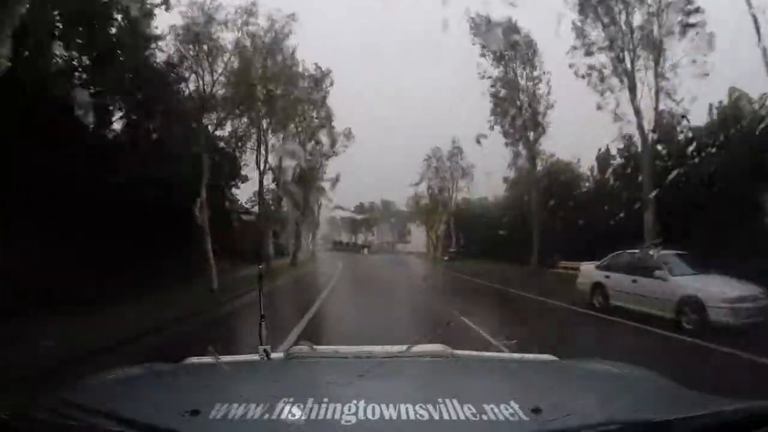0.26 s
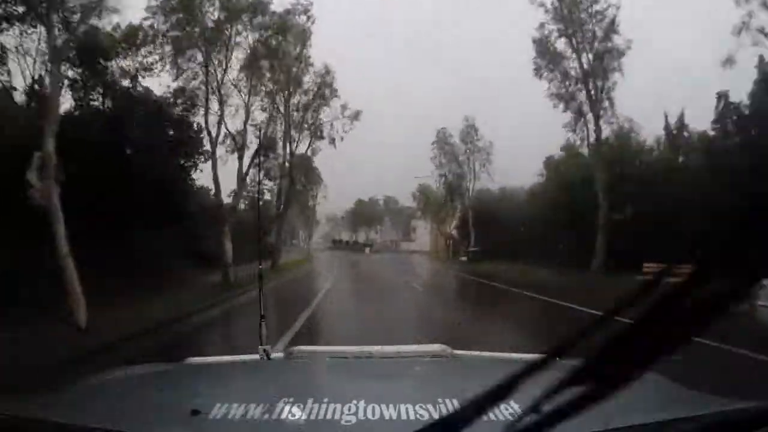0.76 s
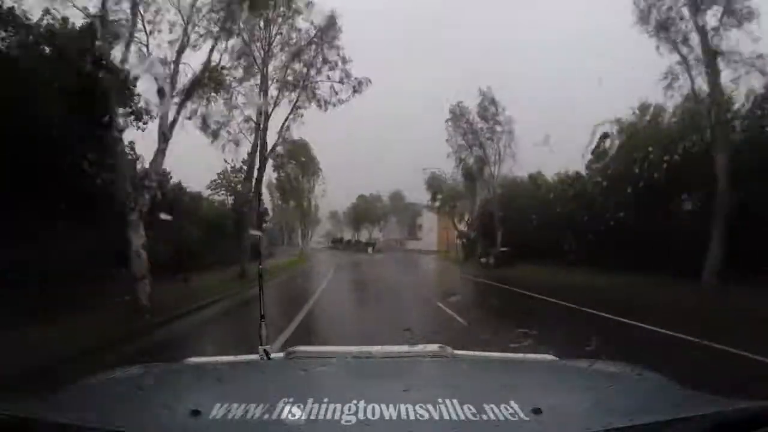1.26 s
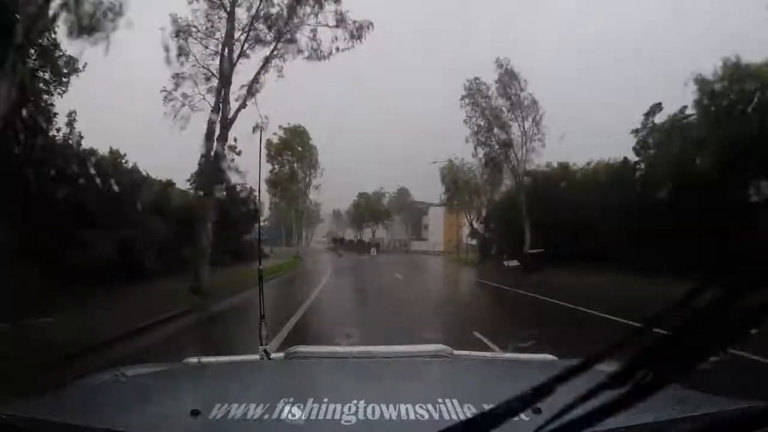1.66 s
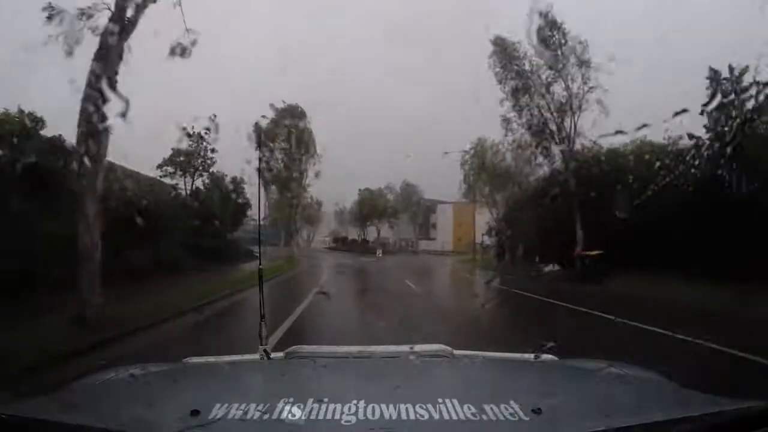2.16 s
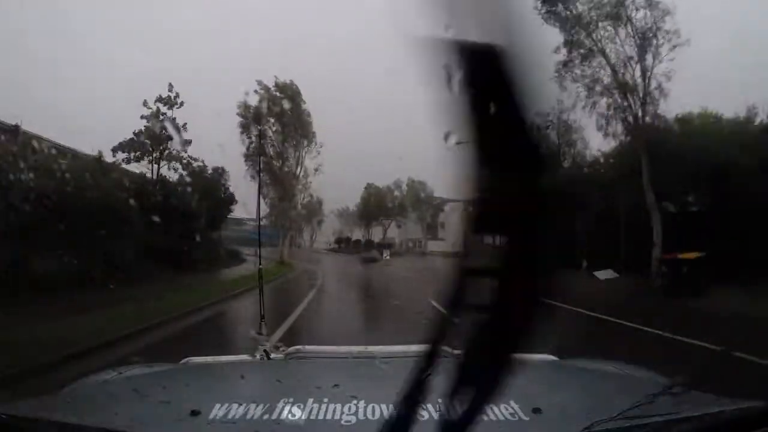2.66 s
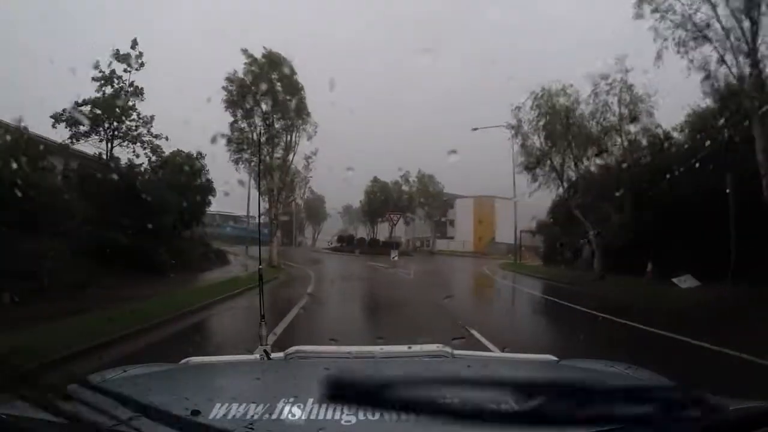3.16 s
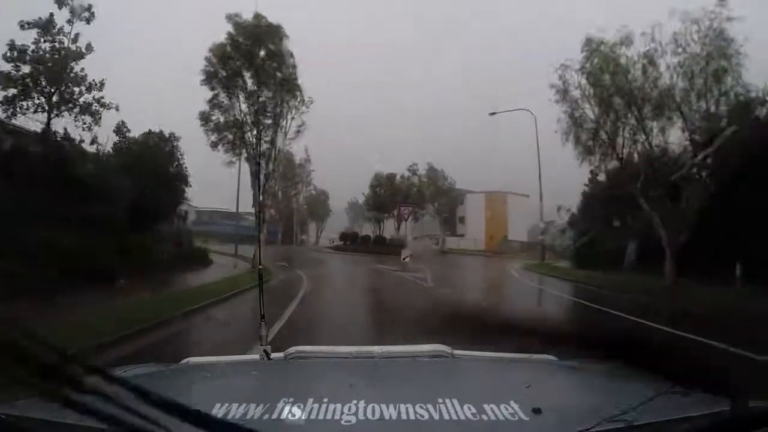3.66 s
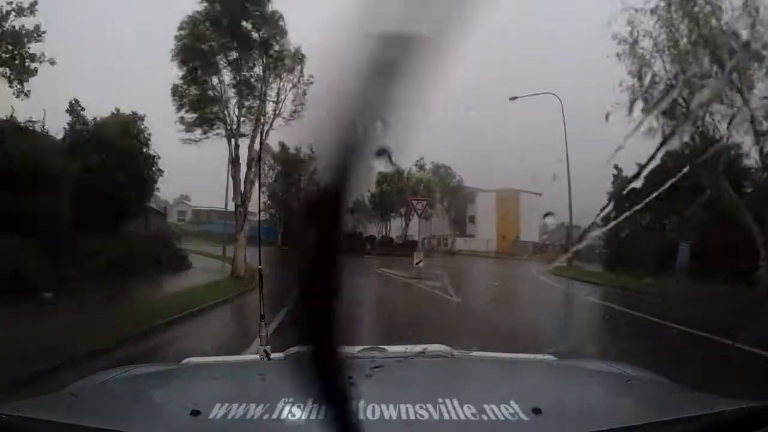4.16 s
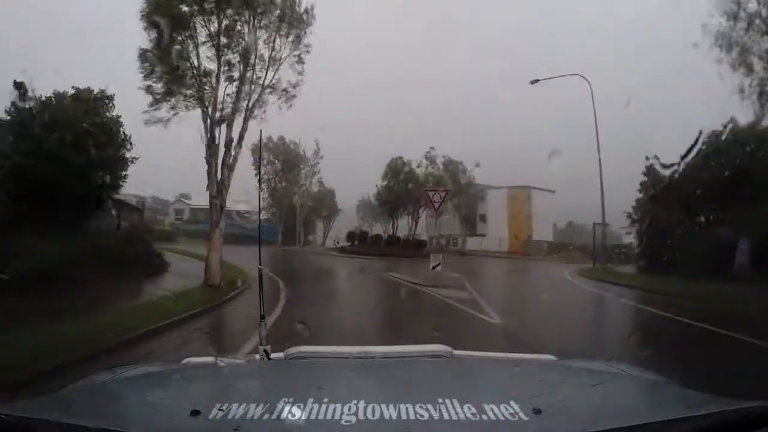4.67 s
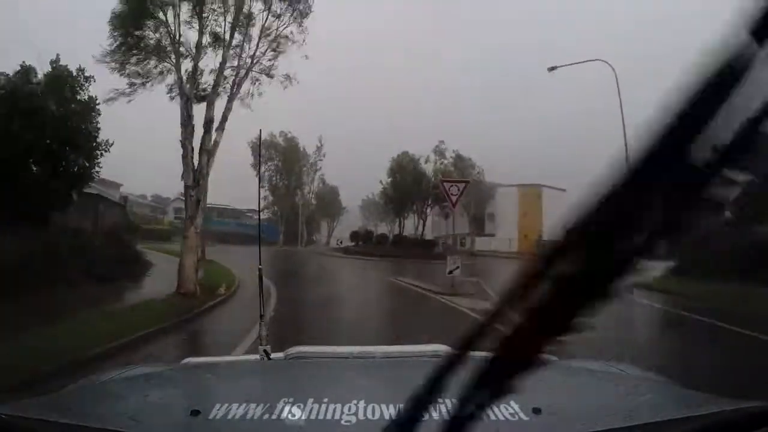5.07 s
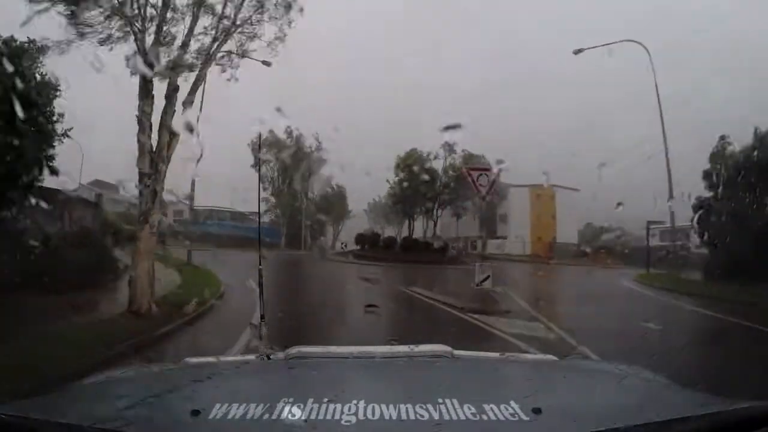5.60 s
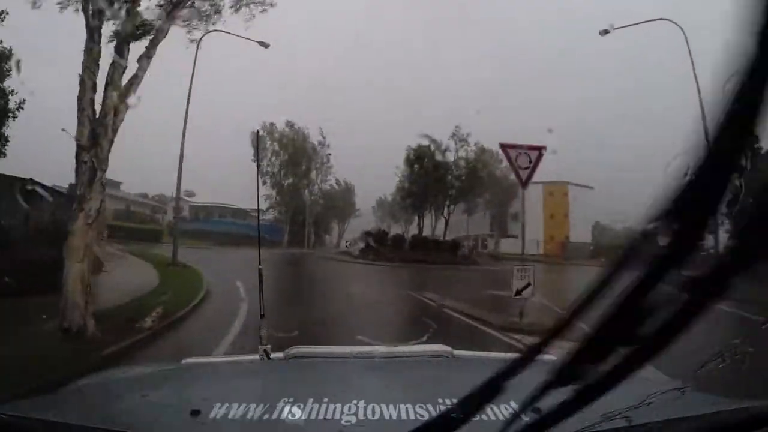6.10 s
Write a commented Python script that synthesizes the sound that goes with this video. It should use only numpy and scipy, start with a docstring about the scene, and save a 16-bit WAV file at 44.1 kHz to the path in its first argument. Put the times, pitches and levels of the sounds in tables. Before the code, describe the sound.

Inside a car in heavy rain, drops spatter and crack on glass and roof while fast wipers thud over low road rumble.

```python
"""Sheets of rain spatter on a car's windscreen, heard from inside, and drum on the roof: random drop impacts.
Heavy drops crack on the glass, fat ones knock on the roof and gusts fling flurries at the body.
Fast wipers thud at the foot of each sweep, ringing cowl modes, and their rubber judders as noisy slips.
Underneath, road and wind rumble as cabin-coloured noise and a slowing engine drones as a wavering sine."""
import sys
import numpy as np
from scipy import signal
from scipy.fft import rfft, irfft, next_fast_len
from scipy.io import wavfile
from scipy.ndimage import uniform_filter1d, minimum_filter1d

SR = 44100
rng = np.random.default_rng(int(sys.argv[2]) if len(sys.argv) > 2 else 0)


def store_wav(level_fs):
    """Save 16-bit WAV to argv[1]."""
    pcm = np.round(np.clip(np.atleast_2d(level_fs), -1, 1) * 32767)
    wavfile.write(sys.argv[1], SR, pcm.T.astype(np.int16))


N = 279594

# strength of the rain on the windscreen: t/s, relative level/dB
RAIN = [(0.0, -38.5), (0.12, -38), (0.36, -41), (0.55, -42), (0.74, -41), (0.868, -39.5), (0.892, -45),
        (1.08, -45.5), (1.21, -42), (1.29, -39.5), (1.36, -39), (1.5, -37.5), (1.66, -42), (1.8, -45.5),
        (1.92, -41), (2.05, -42.5), (2.21, -39), (2.42, -39), (2.8, -44.5), (3.0, -52.5), (3.28, -52.5),
        (3.54, -41), (3.62, -46), (3.82, -49), (3.95, -49.5), (3.98, -46), (4.08, -45.5), (4.32, -44.5),
        (4.355, -55), (4.39, -49), (4.43, -53), (4.46, -47), (4.6, -47), (4.73, -40.5), (4.98, -40.5),
        (5.04, -44), (5.23, -43), (5.3, -48.5), (5.53, -43.5), (5.63, -39.5), (5.71, -45), (5.97, -44.5),
        (5.995, -53.5), (6.035, -48.5), (6.15, -38), (6.26, -41.5), (6.34, -39.5)]
# wiper strokes: thud t/s, thud relative level/dB, blade flop t/s, flop relative level/dB,
# judder level ahead of its low-pass/dB, judder low-pass f/Hz, pitch of the turn f/Hz,
# reference level of the rub over the top/dB
WIPER_STROKES = [(.100, -14.5, 0.06, -13, -19, 890, 206, -26),
                 (0.968, -14, 0.97, -12.5, -21.5, 900, 607, -27.5),
                 (1.830, -12.5, 1.799, -14.5, -20.5, 900, 308, -29),
                 (2.709, -14.5, 2.84, -15, -21.5, 950, 294, -27),
                 (3.572, -11.5, 4, -18.5, -26, 760, 430, -29.5),
                 (4.436, -12, 4.404, -12, -27, 700, 430, -29.5),
                 (5.309, -13, 4.4, -10, -22.5, 600, 352, -31.5),
                 (6.163, -19, 5.7, -22, -23, 1200, 327, -30)]


def from_db(db):
    """Decibels to gain."""
    return 10 ** (np.asarray(db) / 20)


def rms_one(x):
    """Scale to rms 1."""
    return x / np.sqrt(np.mean(x ** 2) + 1e-20)


def in_time(rows):
    """Interpolate each column of a timed curve to every sample."""
    s, *columns = np.transpose(rows)
    return [np.interp(np.arange(N) / SR, s, column) for column in columns]


def add(out, s, sound):
    """Mix a sound in at a time in seconds."""
    at = round(s * SR)
    if 0 <= at < N:
        out[at:at + len(sound)] += sound[:N - at]


def low_pass(x, order, edge_hz):
    """Butterworth low-pass: takes the treble off above the edge."""
    return signal.sosfilt(signal.butter(order, edge_hz, fs=SR, output="sos"), x)


def bump(t, centre_s, width_s):
    """Bell-shaped swell with peak 1; the width is the time from the peak to 1/e."""
    return np.exp(-((t - centre_s) / width_s) ** 2)


def drift(corner_hz):
    """Slow random wander of rms 1: noise through two equal low-pass poles."""
    step, warm_up = 40, 2000  # in samples; in steps
    pole = np.exp(-2 * np.pi * corner_hz * step / SR)
    noise = rng.standard_normal(N // step + warm_up + 2)
    slow = signal.lfilter([1], [1, -2 * pole, pole * pole], noise)[warm_up:]
    return np.interp(np.arange(N) / step, np.arange(len(slow)), rms_one(slow))


def colour(x, spectrum):
    """Causal minimum-phase filter: a source's spectrum with the cabin's resonances on top."""
    # cabin and panel resonances: f/Hz, width/Hz, lift/dB
    cabin = [(41.9, 15.4, 8.5), (144.7, 8.7, 5.5), (255, 17.5, -5), (282.7, 20, 6.5), (407.4, 35, 6.5),
             (447, 85, 6), (627, 46, 8), (757.4, 22, 3.5), (1270, 49, 3.5)]
    size = 2 * next_fast_len(N // 2 + SR // 2)
    hz = np.maximum(np.arange(size // 2 + 1) * SR / size, 1)
    points = np.array(sorted(spectrum))
    db = np.interp(np.log(hz), np.log(points[:, 0]), points[:, 1])
    for centre, width, lift in cabin:
        db = db + lift / (1 + (2 * (hz - centre) / width) ** 2)
    # folding the cepstrum onto positive time gives the minimum phase
    cepstrum = irfft(np.log(from_db(db)))
    cepstrum[1:size // 2] *= 2
    cepstrum[size // 2 + 1:] = 0
    return irfft(rfft(x, size) * np.exp(rfft(cepstrum)))[:N]


def splash(t60, tail_db):
    """One impact: a crack, then waves scattering in the panel and cabin as decaying noise; energy 1."""
    t = np.arange(SR // 10) / SR
    tail = rng.standard_normal(len(t)) * from_db(-60 * t / t60)
    shape = from_db(tail_db) * tail / np.linalg.norm(tail)
    shape[0] += 1  # the crack
    return shape / np.linalg.norm(shape)


def patter(per_s, spread_db, t60, tail_db, count=12):
    """Drops of many sizes land at random on several spots of a panel; even level, rms 1."""
    sizes = from_db(spread_db * np.minimum(rng.exponential(1, N), 5)) * rng.choice([-1, 1], N)
    landed = rng.random(N) < per_s / SR
    drops = sizes * landed / np.sqrt(per_s)  # dense rain gets smoother, not louder
    spot = rng.integers(0, count, N)
    out = np.zeros(N)
    for k in range(count):
        out += signal.oaconvolve(drops * (spot == k), splash(t60, tail_db))[:N]
    return rms_one(out)


def rain_swing():
    """How far the rain is above its mean level, in dB."""
    level_db, = in_time(RAIN)
    return level_db - level_db.mean()


def engine():
    """A wavering sine drone at the firing rate, sinking as the car slows."""
    # engine: t/s, firing rate f/Hz, level/dB
    drone = [(0, 88, -38), (1.8, 86, -31.5), (2.7, 84.9, -28.5), (4.2, 80.98, -34), (4.8, 78, -30.5),
             (5.6, 74.2, -38), (6.34, 73.2, -29)]
    hz, level_db = in_time(drone)
    wavering_hz = hz * (1 + 0.0121 * drift(corner_hz=2.06))
    phase = 2 * np.pi * np.cumsum(wavering_hz) / SR
    return np.sqrt(2) * from_db(level_db + 2.0 * drift(corner_hz=5.3)) * np.sin(phase)


def road():
    """Tyres and wind shake the body as low noise; each bump makes the cabin boom for a moment."""
    # bumps in the road: t/s, boom level/dB; the first row, at 0.125 s, instead thickens the low body of the
    # first wiper thud
    booms = [(.125, -13), (.43, -25), (.64, -17.5), (1.08, -22), (1.40, -19), (1.88, -16.5), (2.24, -23),
             (2.63, -17.5), (2.74, -21.5), (2.9, -21), (3.16, -20), (3.35, -25), (4.028, -20), (4.47, -17),
             (4.97, -22.5), (5.57, -24.5), (5.82, -16.5), (6.07, -27)]
    # rumble: f/Hz, relative level per Hz/dB
    spectrum = [(8, -26), (24, -2.5), (33, -4), (58, -3.5), (75, -8.5), (100, -15.5), (120, -10.5),
                (165, -29), (300, -26), (1000, -62.5), (15000, -120)]
    level_db, fade_db_per_s = -21.5, 0.06
    rise_s, fall_s = 0.032, 0.091
    t = np.arange(N) / SR
    power = from_db(level_db - fade_db_per_s * t) ** 2
    for s, db in booms:
        power = power + (from_db(db) * bump(t, s, np.where(t < s, rise_s, fall_s))) ** 2
    shake = rms_one(colour(rng.standard_normal(N), spectrum))
    even_shake = shake / np.sqrt(uniform_filter1d(shake ** 2, SR // 6))
    return np.sqrt(power) * even_shake


def gusts():
    """Gusts fling short flurries of drops against the body panels."""
    # flurries: t/s, level/dB, time from peak to 1/e/s
    flurries = [(0.288, -34, 0.033), (1.496, -33.5, 0.16), (2.213, -32.5, 0.025), (2.424, -31, 0.073),
                (3.48, -33.5, 0.058), (3.656, -35.5, 0.06), (4.245, -33.5, 0.049), (4.545, -42, 0.022),
                (5.183, -35.5, 0.065), (5.638, -36.5, 0.1), (6.282, -32, 0.2)]
    # drops on the body: f/Hz, relative level per Hz/dB
    spectrum = [(100, -14.5), (300, -18.5), (420, -9.5), (600, -3), (820, -1), (1000, -13), (1500, -22),
                (3000, -36.5), (15000, -67)]
    t = np.arange(N) / SR
    swell = sum(from_db(db) * bump(t, s, width) for s, db, width in flurries)
    drops = patter(2000, spread_db=1.0, t60=0.022, tail_db=8.5, count=8)
    return swell * rms_one(colour(drops, spectrum))


def roof():
    """The lined roof passes only the dull drumming of the drops, which swells with the rain."""
    # drumming: f/Hz, relative level per Hz/dB
    spectrum = [(20, -7), (60, -17), (145, -5.5), (210, 1), (400, -5), (540, -7), (800, -9), (980, -17.5),
                (1500, -20), (3000, -46), (15000, -81.5)]
    mean_rain_db, follows = -31, 0.36  # level at mean rain; dB of drumming per dB of rain
    drops = patter(1900, spread_db=2.27, t60=0.045, tail_db=3.0)
    return from_db(mean_rain_db + follows * rain_swing()) * rms_one(colour(drops, spectrum))


def roof_knocks():
    """A fat drop knocks hollowly on the roof: its spot swings briefly and the panel scatters the wave."""
    # knocks: t/s, relative level/dB, pitch f/Hz
    knocks = [(0.045, -14, 324), (0.222, -19.5, 440), (1.052, -19, 950), (1.454, -14, 560),
              (1.527, -11, 442), (2.350, -14.5, 690), (2.765, -17, 410), (3.435, -19, 565),
              (4.061, -18, 740), (4.302, -19.5, 565), (4.385, -23.5, 600), (4.506, -23.5, 690),
              (4.583, -16, 390), (4.909, -13, 463), (5.371, -16, 600), (5.445, -12, 408), (5.81, -17, 930),
              (6.046, -19, 760)]
    gain_db, swell_cycles = -2.7, 0.65  # the swing's envelope peaks after this many cycles
    out, t = np.zeros(N), np.arange(SR // 20) / SR
    for s, db, hz in knocks:
        age = t * hz / swell_cycles
        swing = np.sin(2 * np.pi * hz * t) * age * np.exp(1 - age)
        knock = signal.fftconvolve(swing, splash(t60=0.065, tail_db=0))
        add(out, s, from_db(db + gain_db) * knock)
    return out


def judder():
    """Rubber lips stick and slip on wet glass: building up to each thud, dull around the sweep's top."""
    # slipping rubber: f/Hz, relative level per Hz/dB
    spectrum = [(20, -45.5), (90, -6.5), (195, 7.5), (300, -0.5), (420, -5), (620, -6), (820, -4.5),
                (1100, -21.5), (15000, -91)]
    # rubs around the top: t after the thud/s, level added to the stroke's rub/dB,
    # time from peak to 1/e/s, low-pass f/Hz
    rubs = [(0.406, -0.5, 0.076, 566), (0.576, -0.5, 0.02, 590)]
    rise_s, fall_s = 0.042, 0.034
    pitch_db, pitch_q = -4.5, 1.4  # the lip favours one slipping rate, set for each stroke
    t, out = np.arange(N) / SR, np.zeros(N)
    drops = patter(900, spread_db=3.5, t60=0.024, tail_db=3.0, count=3)  # each impulse is one slip
    slips = rms_one(colour(drops, spectrum))
    slips = slips / np.sqrt(uniform_filter1d(slips ** 2, SR // 40) + 1e-9)  # even level
    for s, _, _, _, db, edge_hz, pitch_hz, _ in WIPER_STROKES:
        rubbing = from_db(db) * bump(t, s, np.where(t < s, rise_s, fall_s))
        favoured = signal.lfilter(*signal.iirpeak(pitch_hz, pitch_q, fs=SR), slips)
        lip = rms_one(slips + from_db(pitch_db) * favoured)
        out += rubbing * low_pass(lip, 4, edge_hz)
    for delay, db, width, edge_hz in rubs:
        rubbing = sum(from_db(rub_db + db) * bump(t, s + delay, width) for s, *_, rub_db in WIPER_STROKES)
        out += rubbing * low_pass(slips, 4, edge_hz)
    return out


def wipers():
    """Linkage thuds and rebounds, softer turns at the top and light blade flops strike the cowl's modes."""
    # modes of linkage and cowl: f/Hz, relative level/dB, t60/s
    modes = [(43.4, 9, 0.3), (86, -1, 0.19), (147, -7.5, 0.35), (202.7, -6, 0.076), (279.6, -7.5, 0.12),
             (365.4, -7.5, 0.078), (430, -5, 0.098), (499, -13, 0.12), (600, -5, 0.06), (736, -14.5, 0.05)]
    # contacts of one cycle: t after the thud/s, relative level/dB, contact low-pass f/Hz
    contacts = [(-.011, -13, 600), (0, -5, 850), (.0095, -14, 1080), (0.393, -15, 260), (0.436, -10.5, 404)]
    scatter_db, travel_s = 0.5, 0.0012
    turn_db, turn_octaves = 6.5, 0.19  # modes near the pitch of a turn are struck harder
    out, t = np.zeros(N), np.arange(SR // 3) / SR
    hz, mode_db, t60 = np.transpose(modes)
    # modes radiate from three parts of the cowl, each arriving at its own moment
    part = np.arange(len(hz))[:, None] % 3
    age = np.maximum(t - travel_s * part, 0)
    rings = -np.sin(2 * np.pi * hz[:, None] * age) * from_db(-60 * age / t60[:, None])
    light = signal.butter(2, [220, 1300], "band", fs=SR, output="sos")
    for s, thud_db, flop_s, flop_db, _, _, pitch_hz, _ in WIPER_STROKES:
        spot_db = turn_db * np.exp(-(np.log2(hz / pitch_hz) / turn_octaves) ** 2)
        blows = [(flop_s, flop_db - 10.5, light)]
        for delay, db, soft_hz in contacts:
            blows.append((s + delay, thud_db + db, signal.butter(3, soft_hz, fs=SR, output="sos")))
        for when, db, contact in blows:
            strength = from_db(db + mode_db + spot_db + scatter_db * rng.normal(0, 1, len(hz)))
            add(out, when, signal.sosfilt(contact, strength @ rings))
    return out


def big_drops():
    """Single heavy drops crack against the glass; the cabin rings on faintly for a moment."""
    # heaviest drops: t/s, relative level/dB, low-pass f/Hz
    cracks = [(0.077, -10.5, 5000), (0.124, -14, 12000), (0.274, -22, 4500), (0.4214, -20, 8000),
              (0.85, -16, 5000), (1.044, -16, 6000), (1.121, -19, 6500), (1.147, -12, 4000),
              (1.5015, -15, 5500), (1.9305, -24, 7000), (2.365, -14, 9000), (2.622, -24, 5000),
              (2.7116, -14.5, 6000), (2.893, -21, 4000), (3.057, -22, 6000), (3.211, -26, 4500),
              (3.226, -22, 6000), (3.5174, -19, 4000), (3.578, -17, 4500), (3.6346, -22, 5000),
              (3.744, -4.5, 12000), (4.0312, -16, 5030), (4.3994, -23, 5000), (5.553, -25, 11000),
              (5.818, -16.5, 14000), (5.979, -14.5, 5000), (6.0486, -18, 9000), (6.1642, -18, 6000)]
    # heavy drops on glass: f/Hz, relative level per Hz/dB
    spectrum = [(300, -16), (1200, -8.5), (2000, -2.5), (2900, -9), (3800, -5.5), (5200, -16), (6300, -18),
                (8000, -25.5), (14000, -38)]
    out = np.zeros(N)
    for s, db, edge_hz in cracks:
        crack = splash(t60=0.019, tail_db=-1)
        ring_on = from_db(-7.5) * splash(t60=0.043, tail_db=19)
        add(out, s, from_db(db + 15.0) * low_pass(crack + ring_on, 2, edge_hz))
    return colour(out, spectrum)


def windscreen():
    """Thicker rain is louder and smoother; sheets of water slap on with extra fine spray and run off."""
    # rain on glass: f/Hz, relative level per Hz/dB
    spectrum = [(100, -4), (400, -14), (680, 3), (770, 7), (1000, -2), (1300, 0), (1600, -5.5), (2050, -2),
                (2900, -8), (3900, -7), (5100, -18), (6400, -23), (8000, -29.5), (11000, -39), (15000, -50)]
    # treble of the fine spray: t/s, added level/dB
    spray_curve = [(0, 2.5), (0.6, 1.5), (1.0, 2.5), (1.4, 1.5), (2.4, 2.5), (3.25, 1.5), (3.55, -7),
                   (3.9, -0.5), (4.4, -0.5), (5.0, -0.5), (5.5, 0), (6.34, 4.5)]
    # sheets of water slapping on: t/s, added level/dB
    sheets = [(1.228, 2.5), (4.028, 3), (4.619, 1), (5.552, 3), (6.09, 2)]
    runoff_s, sheet_spray = 0.098, 0.44  # decay to 1/e; extra dB of spray per dB of sheet
    t = np.arange(N) / SR
    level_db, = in_time(RAIN)
    spray_db, = in_time(spray_curve)
    sheet_db = sum(db * (t >= s) * np.exp(-np.abs(t - s) / runoff_s) for s, db in sheets)
    per_s = 3200 * from_db(.8 * (rain_swing() + sheet_db))
    drops = patter(per_s, spread_db=2.5, t60=0.023, tail_db=0, count=24)
    glass = rms_one(colour(drops, spectrum))
    spray = signal.sosfiltfilt(signal.butter(2, 5200, "high", fs=SR, output="sos"), glass)
    glass = glass + spray * (from_db(spray_db + sheet_spray * sheet_db) - 1)
    flutter_db = 1.07 * drift(corner_hz=4)  # gusts shake the rain
    return from_db(level_db + sheet_db + 5.5 + flutter_db) * glass


def scene():
    """All the sources add up in one mono channel."""
    car = engine() + road()
    rain = gusts() + roof() + roof_knocks() + big_drops() + windscreen()
    blades = judder() + wipers()
    return (car + rain + blades)[None]


def record(dry):
    """Subsonic sway is reduced, a look-ahead limiter holds down the peaks, the top is cut steeply."""
    x = signal.sosfilt(signal.butter(1, 8, "high", fs=SR, output="sos"), dry)
    headroom = np.minimum(1, .54 / (np.abs(x) + 1e-9))
    x = x * uniform_filter1d(minimum_filter1d(headroom, SR // 60), SR // 60)
    return signal.sosfilt(signal.ellip(10, .1, 80, 15100, fs=SR, output="sos"), x)


dry = scene()
out = record(dry)
store_wav(out)
```